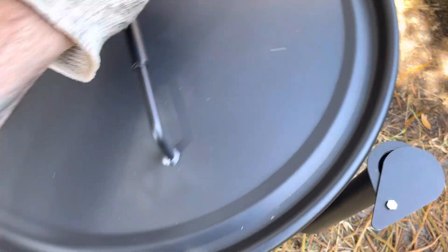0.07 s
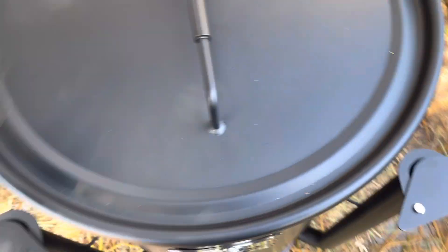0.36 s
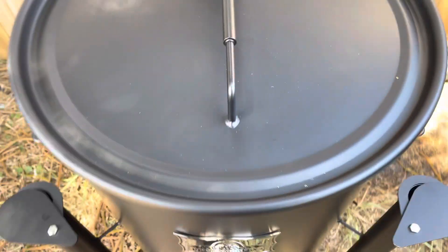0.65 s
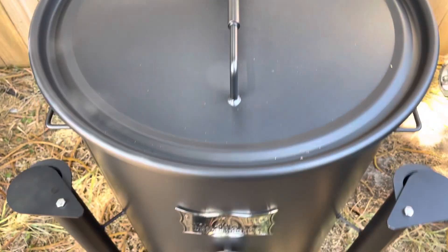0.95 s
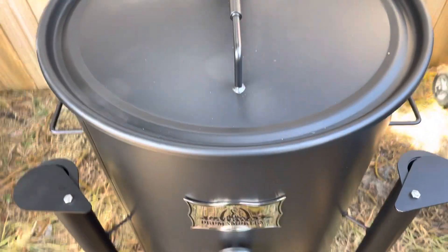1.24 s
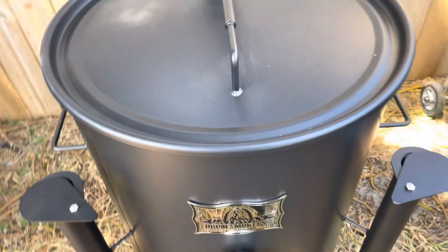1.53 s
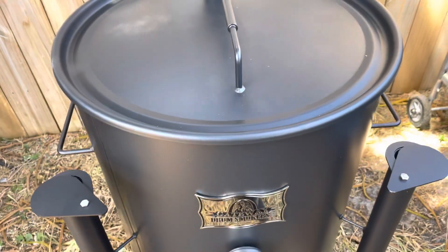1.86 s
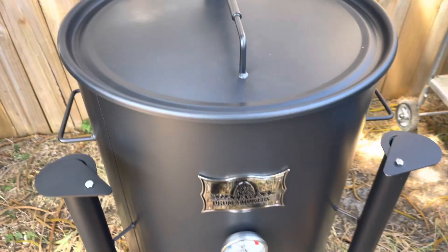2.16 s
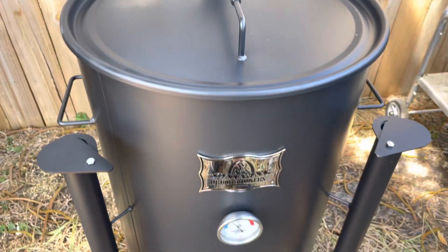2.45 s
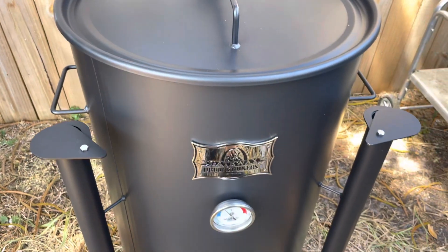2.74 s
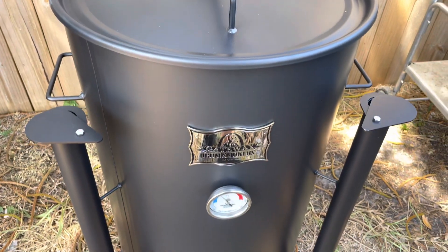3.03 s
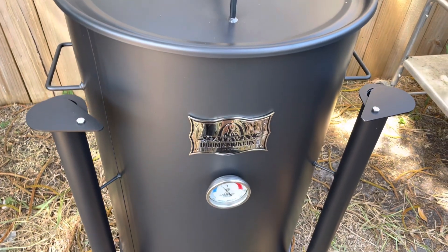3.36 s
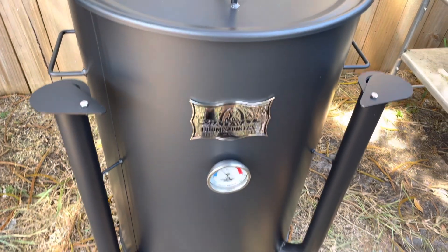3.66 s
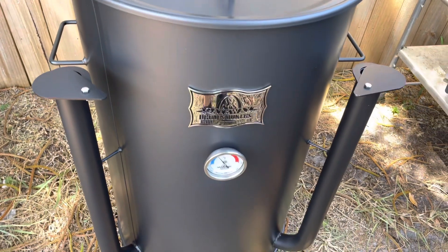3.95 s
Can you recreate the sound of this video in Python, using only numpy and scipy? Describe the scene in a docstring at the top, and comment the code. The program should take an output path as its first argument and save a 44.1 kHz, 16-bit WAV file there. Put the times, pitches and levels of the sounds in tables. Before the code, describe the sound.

A steel lid clangs loudly onto a drum smoker, rattles briefly on the rim and rings down. Outdoors, quiet steps crackle on dry grass with a twig snap and small clicks, while light wind buffets the microphone.

```python
"""A steel lid lands on a steel drum, chatters and scrapes round the rim for 0.2 s, then rings down.
The contacts drive a main note, a set of clear modes and a dense crowd of thin-sheet modes.
Outdoors, someone steps back over dry grass: stalks crackle, a twig snaps, a few small clicks sound.
Wind eddies buffet the microphone over a quiet hiss and one faint high buzz."""
import sys
import numpy as np
from scipy import signal
from scipy.fft import rfft, irfft
from scipy.io import wavfile
from scipy.ndimage import uniform_filter1d

SR = 44100
rng = np.random.default_rng(int(sys.argv[2]) if len(sys.argv) > 2 else 0)


def int16_out(signal):
    """Quantize to a 16-bit WAV file."""
    q = np.round(np.clip(np.atleast_2d(signal).T, -1, 1) * 32767)
    wavfile.write(sys.argv[1], SR, q.astype(np.int16))


N = 176400
T, HZ = np.arange(N) / SR, np.fft.rfftfreq(N, 1 / SR)

# outdoor hiss: freq_hz, gain_db
HISS_SPECTRUM = [(300, 4.5), (600, 0), (1000, -2), (1900, -13), (3500, -21), (6500, -23), (8500, -42),
                 (11500, -27), (13000, -46.5), (15500, -58)]
# hiss, left to right: freq_hz, correlation
HISS_CORRELATION = [(300, 0.54), (1200, 0), (2800, 0.44), (7000, 0.09), (14000, 0.57)]
# narrow bands of the high buzz: freq_hz, half_width_hz, gain_db
BUZZ_BANDS = [(10000, 260, 0), (11100, 480, -1.5)]

# wind envelope: time_s, level_db
WIND_LEVELS = [(0, -41.5), (.27, -36.5), (.58, -46.5), (.72, -48), (.9, -46), (1.04, -38.5), (1.26, -47),
               (1.48, -39.5), (1.64, -44.5), (1.74, -46), (1.95, -35), (2.1, -39), (2.3, -37.5),
               (2.38, -43.5), (2.56, -36.5), (3.0, -38), (3.25, -45), (3.38, -49.5), (3.62, -34),
               (3.76, -40.5), (3.86, -50.5), (4.0, -59.5)]
# turbulence before its low-pass: freq_hz, gain_db
WIND_SPECTRUM = [(20, -49.5), (32, -21), (45, -3), (65, 3), (120, -1.5), (250, -6.5), (600, -6.5),
                 (1500, -32.5)]
# single eddies: start_s, length_s, level_db, edge_hz
EDDIES = [(0.246, 0.062, -28.5, 141), (0.425, 0.028, -27.5, 277), (0.473, 0.046, -27.5, 285),
          (0.553, 0.038, -27.5, 244.1), (0.641, 0.012, -25.5, 313), (0.982, 0.023, -35.5, 310),
          (1.061, 0.021, -31.5, 166), (1.47, 0.025, -33, 254.4), (1.709, 0.051, -31.5, 260),
          (1.764, 0.034, -28.5, 503), (1.846, 0.031, -31.5, 465), (1.897, 0.016, -31, 460),
          (1.925, 0.039, -33.5, 433), (2.036, 0.01, -30.5, 214), (2.06, 0.019, -40, 520),
          (2.128, 0.05, -38, 470), (2.25, 0.085, -45.5, 453), (2.495, 0.04, -36.5, 400),
          (2.553, 0.014, -30.5, 516), (2.688, 0.018, -34, 230), (2.743, 0.023, -35, 348),
          (2.778, 0.015, -30, 437), (2.834, 0.012, -29.5, 390), (2.894, 0.017, -29, 440),
          (2.932, 0.027, -31, 394), (2.961, 0.023, -34, 466), (3.068, 0.03, -30, 500),
          (3.511, 0.011, -30.5, 330), (3.571, 0.0057, -30, 387), (3.603, 0.018, -30, 420),
          (3.643, 0.029, -32, 624), (3.706, 0.018, -33.5, 427)]

# small clicks: start_s, low_db, mid_db, high_db
CLICK_HITS = [(1.49, -52, -59.5, -77), (1.554, -52, -56, -56.5), (1.602, -55, -59, -76),
              (1.6363, -65, -46.5, -47), (1.675, -63, -74, -64), (1.893, -51, -54.5, -57),
              (2.054, -57, -52.5, -47)]
# low, mid and high click bands: centre_hz, sigma_octaves
CLICK_BANDS = [(1300, 0.43), (3500, 0.73), (9600, 0.57)]
# twig modes: pitch_hz, level_db, t60_s
TWIG_MODES = [(486, -37, 0.092), (1110, -48, 0.034), (2000, -49, 0.021), (2140, -47, 0.034),
              (3550, -48.5, 0.012), (3550, -51, 0.024), (5260, -63, .015), (8350, -52.5, 0.017),
              (9150, -72, 0.036)]
# steps in grass: centre_s, length_s, rustle_db, crackle_db
FOOTSTEPS = [(0.25, .06, -66.5, -63), (0.41, 0.12, -62, -74.5), (0.782, 0.11, -53.5, -73.5),
             (0.94, 0.22, -54.5, -73), (1.173, 0.04, -57, -65.5), (1.235, 0.19, -51.5, -71),
             (1.55, 0.34, -57.5, -77), (1.96, 0.4, -61.5, -78), (3.55, 0.27, -64, -75),
             (3.713, 0.068, -63, -64), (3.812, 0.13, -63, -68.5)]
# low rustle of stalks: freq_hz, gain_db
RUSTLE_SPECTRUM = [(300, -3), (700, 3.5), (1100, 1.5), (2000, -8.5), (3500, -20), (7000, -42), (15500, -54)]
# high crackle of stalks: freq_hz, gain_db
CRACKLE_SPECTRUM = [(1000, 4.5), (3500, 6.5), (6500, 2), (10500, 2), (13000, 2), (15500, -27)]
# dull knocks under foot: start_s, decay_s, level_db
FOOT_THUDS = [(0.777, 0.025, -53), (1.239, 0.019, -38.5), (1.673, 0.008, -41)]
# thud colour: freq_hz, gain_db
THUD_SPECTRUM = [(300, -5), (700, -7), (1100, 6), (1700, -14), (2500, -36), (6000, -31), (15000, -46)]

# edge sliding on rim: start_s, decay_s, level_db
RIM_SCRAPES = [(0.023, 0.013, -53), (0.079, 0.018, -45), (0.137, 0.012, -46.5)]
# scrape colour: freq_hz, gain_db
SCRAPE_SPECTRUM = [(2000, -5), (5000, -22), (9500, 15), (12000, 14), (14000, -6), (15500, -21)]
# lid striking rim: time_s, relative_db
RIM_KNOCKS = [(0.001, 7.5), (0.024, 3.5), (0.078, 4.5), (0.111, 0), (0.139, 3), (0.176, -7.5), (0.209, -22)]
# sheet mode strength: freq_hz, gain_db
SHEET_SPECTRUM = [(200, -18), (330, -3.5), (500, 1), (680, 1.5), (900, -1), (1150, -2), (1350, -3.5),
                  (1600, 5), (1900, -1), (2100, 0.5), (2500, -5), (3100, -4.5), (4200, -11.5), (5600, -9.5),
                  (8000, -21), (12000, -21.5), (15500, -45)]
# sheet damping: freq_hz, t60_s
SHEET_DECAY = [(200, 6.7), (600, 2.2), (800, 1.85), (1080, 3.4), (1350, 2.0), (1700, 0.95), (2300, 1.29),
               (3400, 0.86), (5000, 0.55), (8000, 0.4), (15000, 0.48)]
# sheet, left to right: freq_hz, correlation
SHEET_CORRELATION = [(200, 0.62), (600, 0.7), (1300, 0.7), (1700, -0.53), (2200, 0.64), (4200, 0.66),
                     (7000, -0.058), (15000, -0.3)]
# sheet balance: freq_hz, left_minus_right_db
SHEET_BALANCE = [(600, -4), (1150, -2), (1600, -3.5), (2100, -5.5), (2800, 0.5), (5400, 1.5), (7000, -1.5),
                 (10000, 0)]
# clear modes of lid and drum: pitch_hz, gain_db, t60_s
STEEL_MODES = [ (153, -43, 2.0), (285.5, -48, 1.7), (313, -48, 1.6), (398.4, -47, 1.5), (551, -46, 1.6),
               (581.5, -45.5, 1.3), (635, -52, 1.5), (700.3, -44, 1.2), (817, -51, 1.1), (899, -44, .9),
               (1000, -54, 2.2), (1037, -53, 2.6), (1114, -57, 2.6), (1174, -56, 2.6), (1593, -56, 1.2),
               (1669, -56, .9), (1831, -53, 1.0), (2079, -43, .95), (2160, -57, 1.6), (2224.5, -51, 1.0),
               (2373, -44, .9), (2412, -60, 1.6), (2644, -53.5, .9), (2859, -57, .8), (2940, -54, .9),
               (3187, -52.5, .8), (3397, -59, .7), (3908, -61, .6)]


def amp(db):
    """Decibels to gain."""
    return np.exp(np.maximum(db, -400) * (np.log(10) / 20))


def unit(x):
    """Scale to rms 1."""
    return x / np.sqrt(np.mean(x ** 2) + 1e-20)


def lookup(table, hz):
    """Interpolate on a log-frequency axis."""
    freq_hz, value = np.transpose(table)
    return np.interp(np.log(hz + 1), np.log(freq_hz + 1), value)


def noise(gain, correlation=0.):
    """Stereo noise of rms 1 with a given spectrum and left-right correlation."""
    a, b = rfft(rng.standard_normal((2, N)))
    mid, side = a * np.sqrt(1 + correlation), b * np.sqrt(1 - correlation)
    return unit(irfft(np.array([mid + side, mid - side]) * gain, N))


def wander(rate_hz):
    """Smooth random curve of rms 1."""
    return unit(irfft(rfft(rng.standard_normal(N)) / (1 + (HZ / rate_hz) ** 4), N))


def bump(centre_s, length_s):
    """Bell curve, -6 dB at the ends of its length."""
    return amp(-6 * (2 * (T - centre_s) / length_s) ** 2)


def burst(start_s, decay_s):
    """Instant rise, exponential fall."""
    return (T >= start_s) * np.exp(-np.clip((T - start_s) / decay_s, 0, 20))


def background(level_db=-58):
    """Steady distant outdoor hiss."""
    return amp(level_db) * noise(amp(lookup(HISS_SPECTRUM, HZ)), lookup(HISS_CORRELATION, HZ))


def high_buzz(start_s=2.63, rise_s=0.027, fade_from_s=2.77, fade_s=0.23, throb_hz=20, level_db=-79.5):
    """A faint high buzz in two narrow bands near 10 and 11 kHz, throbbing as it fades."""
    spectrum = sum(amp(db) / (1 + ((HZ - hz) / width_hz) ** 2) for hz, width_hz, db in BUZZ_BANDS)
    envelope = np.clip((T - start_s) / rise_s, 0, 1) * np.exp(-np.maximum(T - fade_from_s, 0) / fade_s)
    throb = 1 + 0.27 * np.sin(2 * np.pi * throb_hz * T)
    return amp(level_db) * envelope * throb * noise(spectrum)


def eddy(start_s, length_s, rise_s=0.0044, wake_gain=0.13, wake_s=0.036):
    """Envelope of one eddy: fast arrival, roll-off, weak wake."""
    rise = np.clip((T - start_s) / rise_s, 0, 1)
    return rise * np.maximum(bump(start_s, 2 * length_s), wake_gain * burst(start_s, wake_s))


def wind(flutter_db=3.5, ref_edge_hz=202.6, ref_db=-41.0, db_per_octave=13.5, order=4.62, bands=13):
    """Turbulence at the microphone: stronger wind reaches higher, single eddies thump."""
    level_db = np.interp(T, *np.transpose(WIND_LEVELS)) + flutter_db * wander(15.6)
    power = amp(level_db) ** 2
    weighted_edge = power * ref_edge_hz * 2 ** ((level_db - ref_db) / db_per_octave)
    for start_s, length_s, db, hz in EDDIES:
        eddy_power = (amp(db) * eddy(start_s, length_s)) ** 2
        power += eddy_power
        weighted_edge += eddy_power * hz
    edge_hz = weighted_edge / power
    turbulence = rfft(noise(amp(lookup(WIND_SPECTRUM, HZ)), correlation=0.85))
    centres_hz, rumble = np.geomspace(60, 3000, bands), 0
    for k, hz in enumerate(centres_hz[:-1]):  # moving low-pass, band by band
        band = irfft(turbulence * np.interp(HZ, centres_hz, np.arange(bands) == k), N)
        rumble += band / np.sqrt(1 + (hz / edge_hz) ** (2 * order))
    running_rms = np.sqrt(uniform_filter1d(uniform_filter1d((rumble ** 2).mean(0), 1800), 1200))
    return rumble / running_rms * np.sqrt(power)


def clicks(decay_s=0.0014, tail_db=-24, tail_s=0.022):
    """Small dry clicks, each with its own colour and a short tail."""
    out = 0
    for k, (centre_hz, sigma_octaves) in enumerate(CLICK_BANDS):
        envelope = sum(amp(band_db[k]) * (burst(start_s, decay_s) + amp(tail_db) * burst(start_s, tail_s))
                       for start_s, *band_db in CLICK_HITS)
        band = np.exp(-.5 * (np.log2((HZ + 1) / centre_hz) / sigma_octaves) ** 2)
        out += envelope * noise(band, correlation=0.026)
    return out


def twig_snap(start_s=1.4472, rise_s=.0003, jitter_s=.00006, rough_hz=300):
    """A twig cracks under foot; splintering fibres roughen its modes."""
    age_s = np.maximum(T - start_s, 0)
    rough_age_s = age_s + jitter_s * wander(rough_hz)
    out = 0
    for hz, db, t60_s in TWIG_MODES:
        phase = 2 * np.pi * (hz * rough_age_s + rng.random((2, 1)) / 2)
        out += amp(db - 60 * age_s / t60_s) * np.sin(phase)
    return np.minimum(age_s / rise_s, 1) * out


def steps(grains_per_s=2600, spread_db=7.5):
    """Dry stalks rustle and crackle under each step, with an occasional dull thud."""
    thuds = sum(amp(db) * burst(start_s, decay_s) for start_s, decay_s, db in FOOT_THUDS)
    out = thuds * noise(amp(lookup(THUD_SPECTRUM, HZ)))
    for k, spectrum in enumerate([RUSTLE_SPECTRUM, CRACKLE_SPECTRUM]):
        grain_db = spread_db * np.minimum(rng.exponential(1, (2, N)), 5)
        grains = amp(grain_db) * rng.choice([-1, 1], (2, N))
        grains *= rng.random((2, N)) < grains_per_s / SR
        crunch = unit(grains) + rng.standard_normal((2, N))
        pressure = sum(amp(db[k]) * bump(centre_s, length_s) for centre_s, length_s, *db in FOOTSTEPS)
        out += pressure * unit(irfft(rfft(crunch) * amp(lookup(spectrum, HZ)), N))
    return out


def scrapes(catches_per_s=2500, catch_s=0.00066):
    """The lid's edge slides on the rim in a rush of tiny catches."""
    catches = (rng.random(N) < catches_per_s / SR) * rng.exponential(1, N)
    grit = unit(signal.lfilter([1], [1, -np.exp(-1 / (catch_s * SR))], catches))
    envelope = sum(amp(db) * burst(start_s, decay_s) for start_s, decay_s, db in RIM_SCRAPES)
    return envelope * grit * noise(amp(lookup(SCRAPE_SPECTRUM, HZ)), correlation=-0.35)


def contact_force(chatter_s=0.12, chatter_per_s=1500, chatter_db=-17, settle_s=0.013):
    """Unit-energy force on the lid: knocks, plus fine chatter that stops as it seats."""
    envelope = amp(chatter_db) * np.exp(-np.maximum(T - chatter_s, 0) / settle_s)
    force = envelope * rng.standard_normal(N) * (rng.random(N) < chatter_per_s / SR)
    for time_s, db in RIM_KNOCKS:
        force[round(time_s * SR)] += amp(db)
    return force / np.linalg.norm(force)


def sheet_crash(force, gain_db=-38, count=1600, spread_db=3.5, t60_spread=.08,
                shimmer_db=1.5, shimmer_hz=14):
    """Dense, unevenly excited and damped modes of thin steel; the treble dies first."""
    size = 2 * SR
    hz = 200 + 15300 * ((np.arange(count) + rng.random(count)) / count) ** 1.5
    uneven = amp(spread_db * rng.standard_normal(count))
    uneven /= np.sqrt(uniform_filter1d(uneven ** 2, size=11))
    strength = uneven * amp(lookup(SHEET_SPECTRUM, hz)) * hz ** (1 / 6)  # offsets sparser high modes
    apart_rad = np.arccos(lookup(SHEET_CORRELATION, hz)) * rng.choice([-1, 1], count)
    balance = amp(np.outer([.5, -.5], lookup(SHEET_BALANCE, hz)))
    phase = 2 * np.pi * rng.random(count) + np.outer([.5, -.5], apart_rad)
    modes = strength * balance * np.exp(1j * phase)
    t60_s = lookup(SHEET_DECAY, hz) * np.exp(t60_spread * rng.standard_normal(count))
    shimmer = unit(amp(shimmer_db * wander(shimmer_hz)))  # mimics energy passing between modes
    response = np.zeros((2, size))
    for group in np.array_split(np.argsort(t60_s), 40):  # similar t60s share an envelope
        lines = np.zeros((2, size // 2 + 1), complex)
        lines[:, (hz[group] * size / SR).astype(int)] = modes[:, group]
        decay = amp(-60 * T[:size] / t60_s[group].mean())
        response += irfft(lines, size) * decay * np.roll(shimmer, rng.integers(N))[:size]
    response /= np.sqrt(np.mean(response[:, :SR // 20] ** 2))  # rms 1 over the first 50 ms
    return 2 * amp(gain_db) * signal.fftconvolve(response, force[None], axes=1)[:, :N]


def ring_envelope(force, t60_s):
    """A mode gathers energy from the contacts and loses it to damping."""
    energy = signal.lfilter([1], [1, -amp(-120 / (t60_s * SR))], force ** 2)
    return 2 * np.sqrt(energy)


def clear_modes(force, beat_db=3.0, jostle_rad=.4, jostle_s=0.3, stereo_rad=.5):
    """Lid and drum modes ring and waver; their phase wobbles while the lid still moves."""
    beat = wander(11.0)
    wobble = wander(15)
    moving = np.exp(-(T / jostle_s) ** 2)
    out = 0
    for hz, db, t60_s in STEEL_MODES:
        shift = rng.integers(N)
        treble = min(hz / 1500, 1)
        stereo = stereo_rad * treble * rng.choice([-1, 1]) * np.array([[1], [-1]])
        jostle = jostle_rad * treble * moving * np.roll(wobble, shift)
        phase = 2 * np.pi * (hz * T + rng.random()) + jostle + stereo
        out += amp(db + beat_db * np.roll(beat, shift)) * ring_envelope(force, t60_s) * np.sin(phase)
    return out


def lid_note(force, pitch_hz=428.0, sharp_hz=2.87, sharp_s=0.098, gain_db=-30, waver_db=1.2, t60_s=2.375):
    """The lid's main mode: slightly sharp while driven, then settling."""
    glide_hz = pitch_hz + sharp_hz * np.exp(-T / sharp_s)
    envelope = amp(gain_db + waver_db * wander(48)) * ring_envelope(force, t60_s)
    balance = amp([[.5], [-.5]])
    return balance * envelope * np.sin(2 * np.pi * np.cumsum(glide_hz) / SR)


def scene():
    """Lid on drum, footsteps and outdoor ambience, in stereo."""
    force = contact_force()
    steel = lid_note(force) + clear_modes(force) + sheet_crash(force) + scrapes()
    return steel + steps() + twig_snap() + clicks() + wind() + high_buzz() + background()


def record(dry, cutoff_hz=15800):
    """The recorder's band limit."""
    lowpass = signal.firwin(511, cutoff_hz, window=("kaiser", 9), fs=SR)
    return signal.oaconvolve(dry, lowpass[None], "same")


dry = scene()
out = record(dry)
int16_out(out)
```